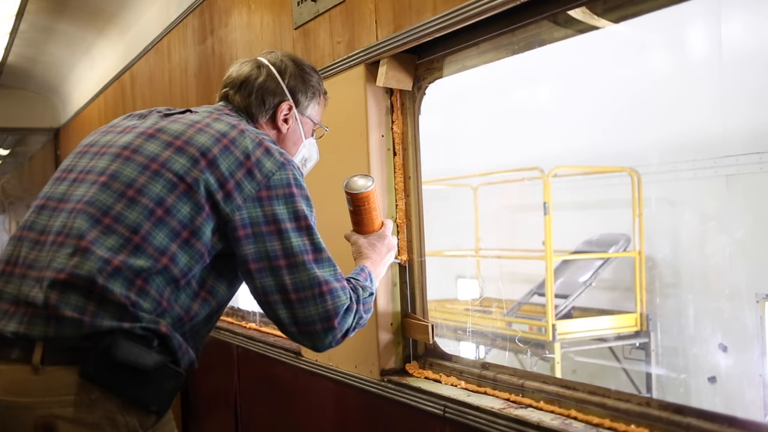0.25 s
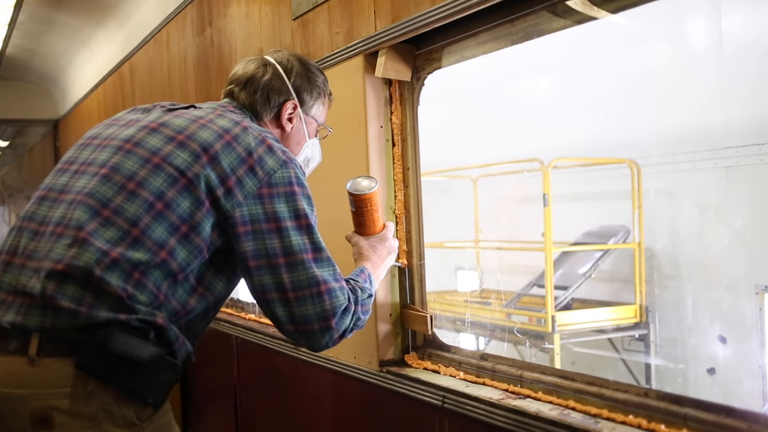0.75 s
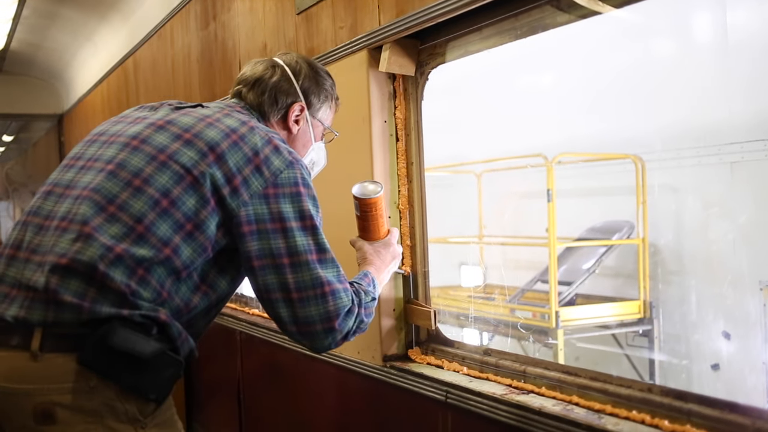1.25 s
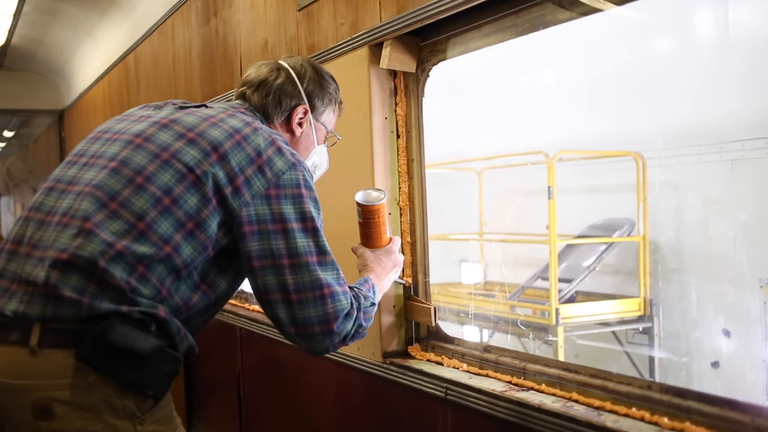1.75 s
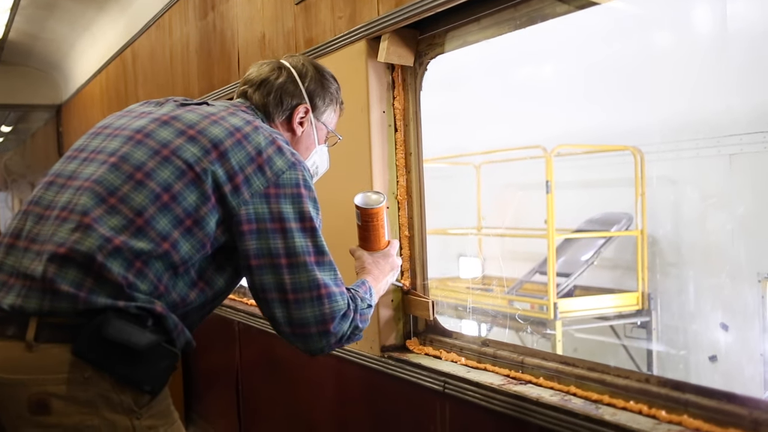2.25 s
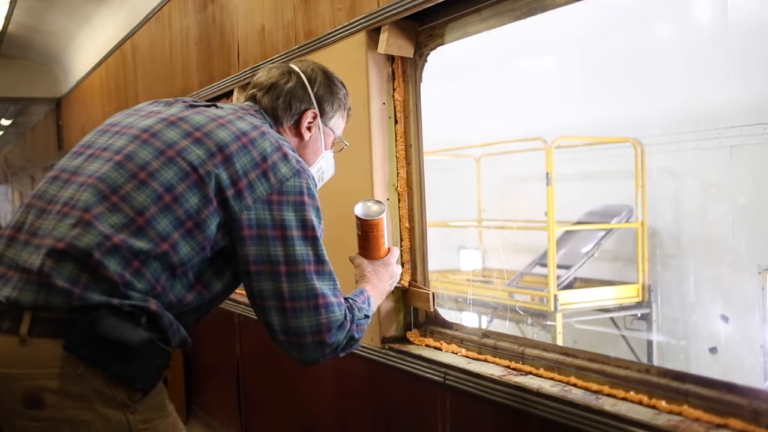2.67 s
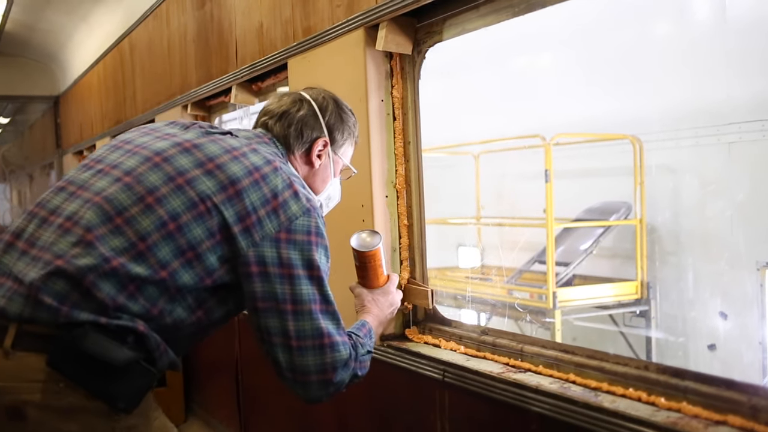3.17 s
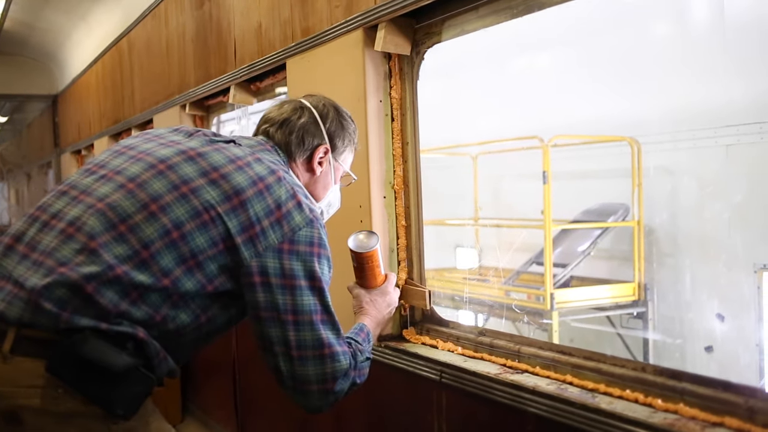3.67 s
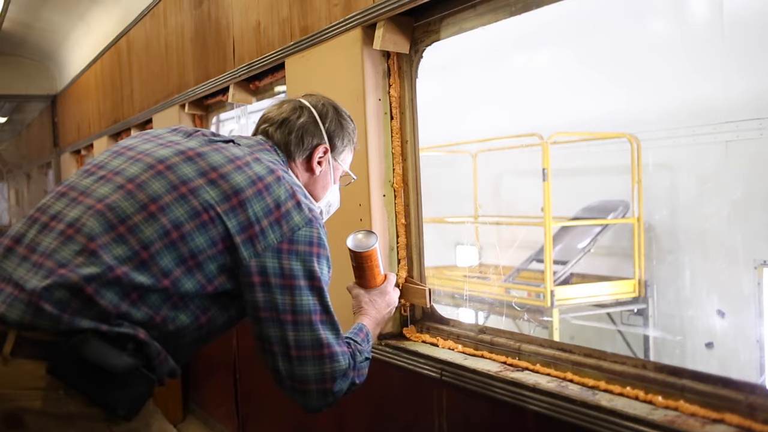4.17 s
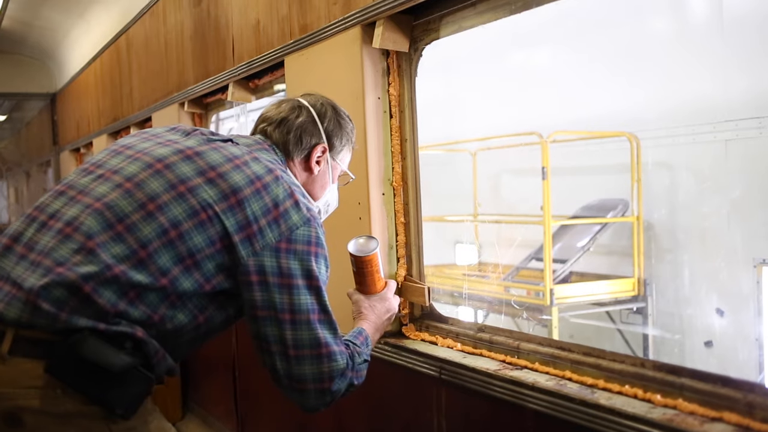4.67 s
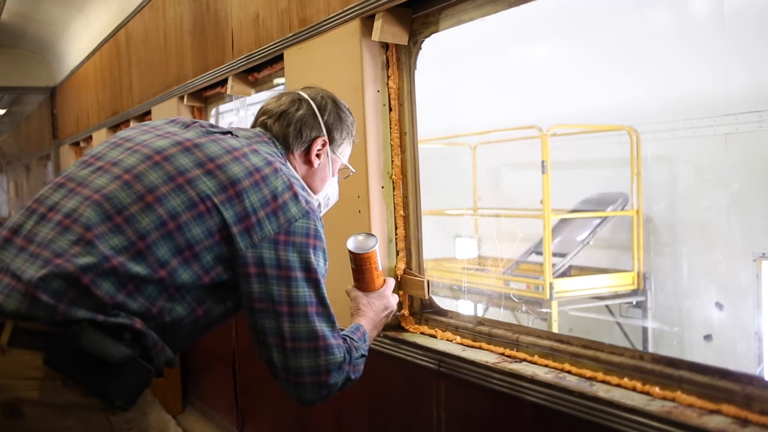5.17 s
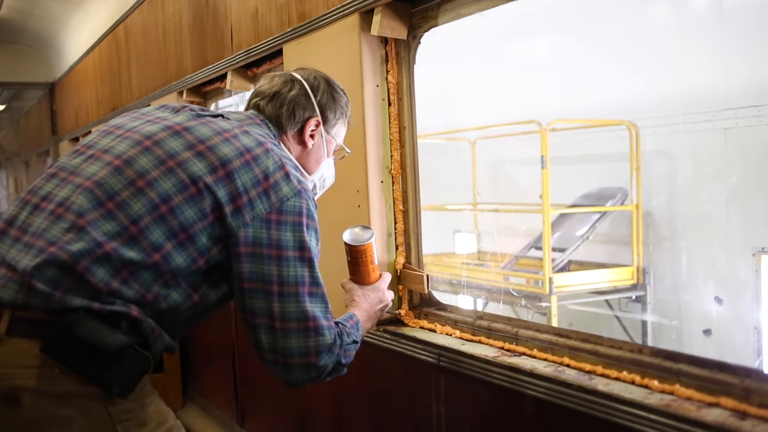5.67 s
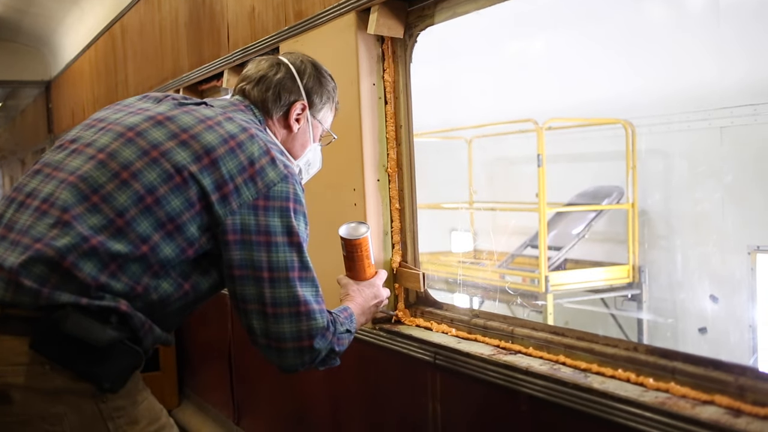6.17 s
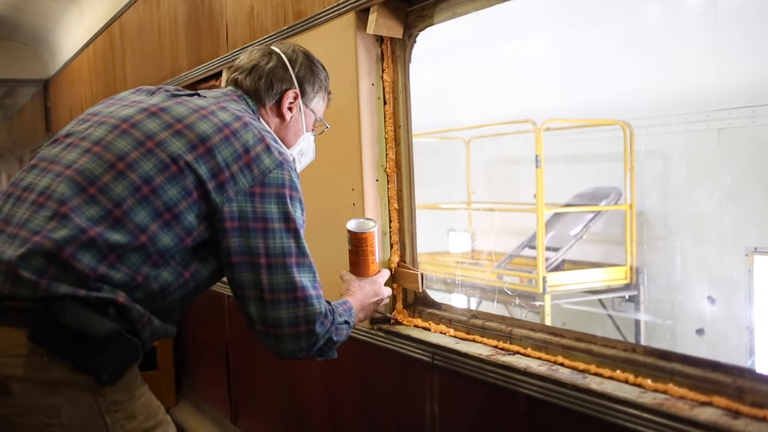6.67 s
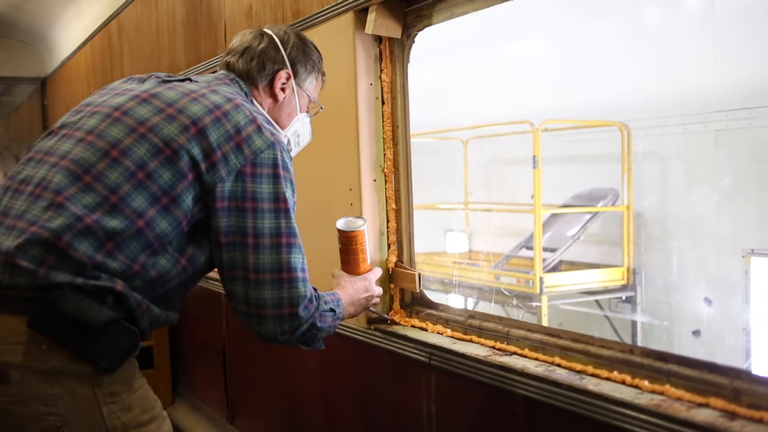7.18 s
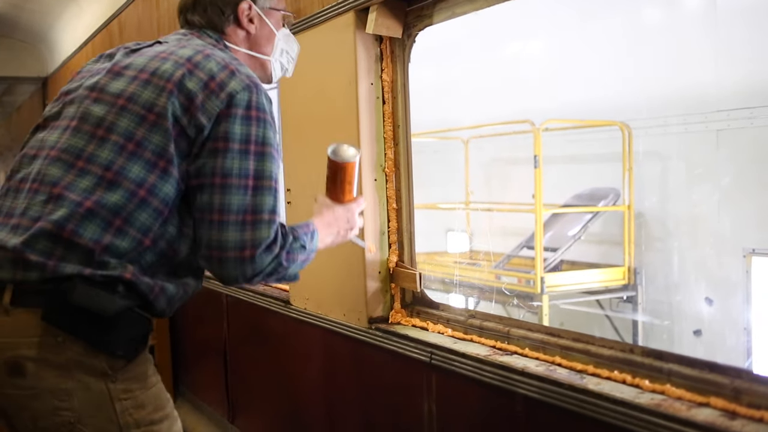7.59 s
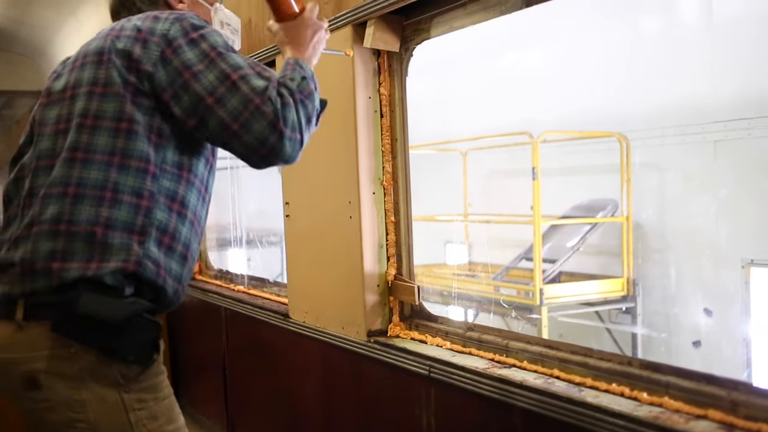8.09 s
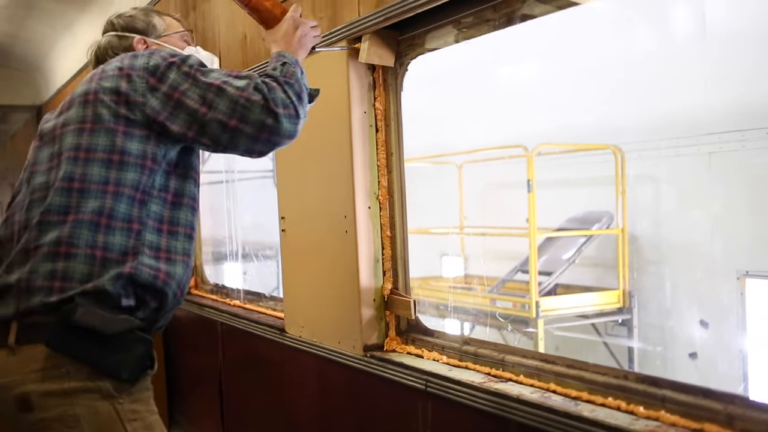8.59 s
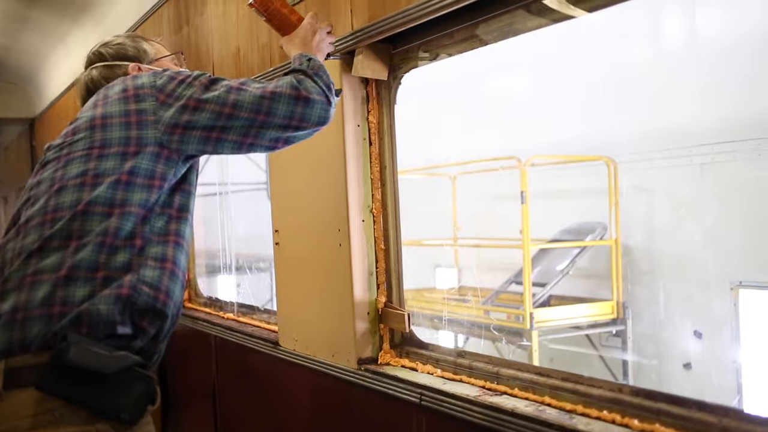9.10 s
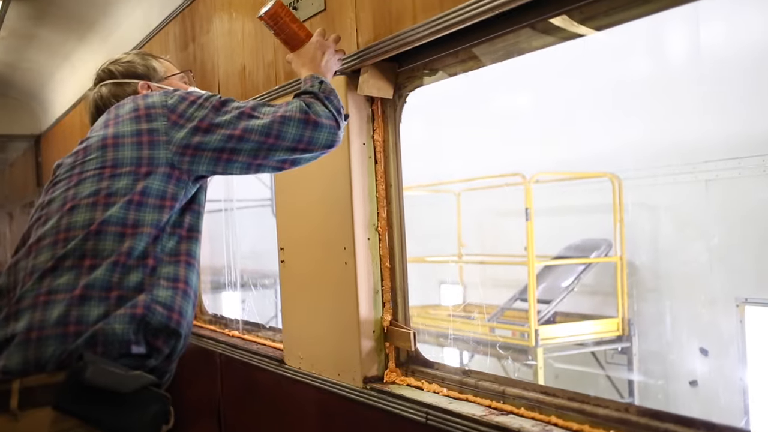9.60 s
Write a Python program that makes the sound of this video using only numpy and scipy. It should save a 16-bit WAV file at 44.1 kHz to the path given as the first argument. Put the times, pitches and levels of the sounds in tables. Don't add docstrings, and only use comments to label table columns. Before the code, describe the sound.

Expanding foam gurgles thick and wet from a can in three squeezes, spitting and crackling over a machine drone, then puffs, knocks and a pop.

```python
import sys
import numpy as np
from scipy import signal
from scipy.fft import rfft, irfft, next_fast_len
from scipy.io import wavfile
from scipy.ndimage import uniform_filter1d

SR = 44100
rng = np.random.default_rng(int(sys.argv[2]) if len(sys.argv) > 2 else 0)


def level_to_linear(level):
    exponent = np.asarray(level, float) / 20
    return 10 ** exponent


def digitize_waveform(pressure):
    field = np.atleast_2d(pressure).T
    bounded = np.clip(field, -1, 1)
    quanta = np.round(bounded * 32767).astype(np.int16)
    wavfile.write(sys.argv[1], SR, quanta)


N = 434369

FIRST_MOVE_S, SECOND_MOVE_S = 1, 2.86
POCKET_HZ = (300, 760, 1300, 1860, 2600, 6000)
# start_s, flow_db, commonest pocket (octaves above the big ones),
# narrowing (dB per octave squared), gas_db
SECOND_SQUEEZE = [
    (2.95, -44.5, 0.0, 3.6, -58),
    (3.3, -39, 0.0, 2.2, -55),
    (3.65, -40, 0.36, 0.41, -54),
    (4.05, -34, 0.0, 1.2, -58),
    (4.45, -34.5, 0.49, 3, -54),
    (4.85, -26, 0.85, 13.6, -50.5),
    (5.1, -31, 0.45, 9.4, -48),
    (5.36, -38, 0.028, 3.4, -57),
    (5.47, -55, 0.2, 5, -62),
]
THIRD_SQUEEZE = [
    (6.28, -59, 0.2, 2, -58),
    (6.36, -42, 0.0, 3, -54),
    (6.44, -41, 0.0, 2.3, -49),
    (6.52, -29.5, 0.0, 7.2, -55),
    (6.78, -32.5, 0.035, 3.2, -55),
    (6.9, -44.5, 0.0, 2.8, -55),
    (7.03, -40.5, 0.17, 7.1, -65),
    (7.15, -38.5, 0.0, 12, -66),
    (7.26, -64.5, 0.0, 3, -62),
]


def rms_one(x):
    return x / np.sqrt(np.mean(x ** 2) + 1e-20)


def in_time(rows):
    s, *columns = np.transpose(rows)
    return [np.interp(np.arange(N) / SR, s, column) for column in columns]


def drift(rate):
    r = np.exp(-40 * np.pi * rate / SR)
    coarse = rng.standard_normal(N // 20 + 4002)
    slow = signal.lfilter([1], [1, -2 * r, r * r], coarse)[4000:]
    return np.interp(np.arange(N) / 20, np.arange(len(slow)), rms_one(slow))


def weigh(x, points_hz, gains):
    size = next_fast_len(N)
    hz = np.maximum(np.arange(size // 2 + 1) * SR / size, 1)
    return rfft(x, size) * np.interp(np.log(hz), np.log(points_hz), gains), size


def colour(x, spectrum):
    size = next_fast_len(N)
    hz = np.maximum(np.arange(size // 2 + 1) * SR / size, 1)
    points_hz, points_db = np.transpose(spectrum)
    gain = level_to_linear(np.interp(np.log(hz), np.log(points_hz), points_db))
    return rms_one(irfft(rfft(x, size) * gain, size)[:N])


def slice_band(x, low_hz, top_hz, high_hz):
    weighted, size = weigh(x, [low_hz, top_hz, high_hz], [0, 1, 0])
    return irfft(weighted, size)[:N]


def resonance(x, hz, width_hz):
    r = np.exp(-np.pi * width_hz / SR)
    zeros = (1 - r * r) / 2 * np.array([1, 0, -1])
    return signal.lfilter(zeros, [1, -2 * r * np.cos(2 * np.pi * hz / SR), r * r], x)


def grains(per_s, spread_db):
    sizes = level_to_linear(spread_db * np.minimum(rng.exponential(1, N), 4)) * rng.choice([-1, 1], N)
    return rms_one(sizes * (rng.random(N) < per_s / SR) + 1e-18)


def bumps(rows, half_s):
    t = np.arange(0, N, 50) / SR
    lift_db = sum(db * np.clip(1 - np.abs(t - s) / half_s, 0, 1) for s, db in rows)
    return np.interp(np.arange(N) / SR, t, lift_db)


def pulses(times, heights, rise_s, fall_s):
    clicks = np.full(N, 1e-18)
    clicks[(np.asarray(times) * SR).astype(int)] = heights
    t = np.arange(4000) / SR
    shape = (1 - np.exp(-t / rise_s)) * np.exp(-t / fall_s)
    return signal.oaconvolve(clicks, shape / shape.max())[:N]


def swells(rows, steady_db):
    t = np.arange(0, N, 100) / SR
    gain = np.full(len(t), level_to_linear(steady_db))
    for middle_s, length_s, db in rows:
        gain += level_to_linear(db) * np.cos(np.pi * np.clip((t - middle_s) / length_s, -.5, .5)) ** 2
    return np.interp(np.arange(N) / SR, t, gain)


def lone_bursts(flow_db):
    # start_s, peak_db
    large_bursts = [(0.027, -13), (0.089, -12), (0.121, -12), (0.177, -13.5), (0.21, -16), (0.258, -13.5),
                    (0.321, -17.5), (0.39, -18), (0.46, -34), (0.491, -23), (0.553, -19.5), (0.577, -13.5),
                    (0.637, -19), (0.701, -19), (0.749, -16.5), (0.832, -26), (0.88, -25), (0.916, -16.5),
                    (0.94, -14.5), (0.965, -16), (1.013, -22), (1.042, -14), (1.096, -14), (1.153, -13),
                    (1.186, -15.5), (1.215, -13.5), (1.292, -20), (1.344, -16), (1.393, -14.5), (1.431, -13.5),
                    (1.454, -16), (1.48, -22), (1.508, -15), (1.562, -19), (1.602, -16), (1.638, -12.5),
                    (1.72, -16), (1.746, -16.5), (1.786, -11.5), (1.822, -13.5), (1.849, -15), (1.89, -14),
                    (1.918, -12.5), (1.962, -8.5), (2.004, -12.5), (2.034, -12.5), (2.102, -10.5), (2.144, -13),
                    (2.203, -16.5), (2.242, -14), (2.291, -18.5), (2.327, -18), (2.375, -17), (2.437, -16.5),
                    (2.481, -21),
                    (3.005, -22), (3.1, -22), (3.233, -20), (3.31, -23), (3.512, -21), (3.596, -14.5),
             (3.678, -27.5), (3.749, -19.5), (3.813, -19.5), (3.845, -25), (3.868, -15.5), (3.931, -14),
             (3.985, -25), (4.018, -28), (4.044, -17), (4.141, -21), (4.171, -16.5), (4.237, -17),
             (4.262, -20.5), (4.288, -21.5), (4.313, -21.5), (4.364, -14), (4.454, -16), (4.476, -28),
             (4.504, -21.5), (4.525, -32), (4.558, -16.5), (4.625, -18.5), (4.676, -22), (4.698, -18),
             (4.734, -17), (4.782, -11), (4.837, -9.5), (4.895, -21), (4.931, -22.5), (4.954, -7.5),
             (5.001, -20), (5.051, -21), (5.085, -27), (5.124, -23.5), (5.157, -14), (5.184, -19.5),
             (5.271, -29), (5.294, -26), (5.33, -21), (6.096, -28), (6.404, -26), (6.446, -18),
             (6.502, -17), (6.532, -25), (6.565, -24), (6.644, -18), (6.732, -15), (6.757, -18),
             (6.788, -16), (6.911, -26), (6.991, -28), (7.094, -22)]
    s, db = np.transpose(large_bursts)
    flow_crest_db = flow_db[(s * SR).astype(int)] + 13
    above_db = np.clip(db - flow_crest_db, 0, 14)
    return 1 + pulses(s, level_to_linear(above_db) - 1, rise_s=0.0026, fall_s=0.0093)


def pockets(flow_db, common_octave, narrowing_db):
    # middle_s, extra_db
    glugs = [(3.12, 5), (3.52, 2), (3.82, 2), (3.99, 9), (4.32, 5.5), (4.51, 4.5), (4.57, 3), (4.74, 6.5),
             (4.9, 9), (5.13, 6), (5.35, 6), (6.425, 11)]
    # middle_s, extra_db
    froth = [(0.08, -2), (0.95, 0), (1.43, -2), (3.41, 8), (3.51, 3), (3.7, 7.5), (3.88, 1), (4.19, -1),
             (4.38, 0), (4.6, 3), (6.45, 1), (6.65, 6), (6.78, 6)]
    small_damped_db = (0.5, -3.5, -5, -1)
    octaves = np.log2(np.array(POCKET_HZ[1:-1]) / POCKET_HZ[1])
    sizes_db = [flow_db - narrowing_db * (octave - common_octave) ** 2 for octave in octaves]
    big_db, middle_db, small_db, fine_db = sizes_db
    corners_s = (FIRST_MOVE_S, FIRST_MOVE_S + 0.33, SECOND_MOVE_S, SECOND_MOVE_S + .45,
                 SECOND_SQUEEZE[-1][0], THIRD_SQUEEZE[0][0])
    corners_db = np.array(small_damped_db)[[0, 1, 1, 2, 2, 3]]
    hollow_db = np.interp(np.arange(N) / SR, corners_s, corners_db)
    big_db = big_db + bumps(glugs, half_s=0.052)
    froth_db = bumps(froth, half_s=0.037)
    small_db = small_db + hollow_db + 0.98 * froth_db
    return big_db, middle_db - big_db, small_db - big_db, fine_db + froth_db - big_db


def hollow(ringing, splashing, modes):
    rung = 0
    for k, (hz, width_hz, db) in enumerate(modes):
        rung = rung + (-1) ** k * level_to_linear(db) * resonance(ringing, hz, width_hz)
    return rms_one(rung) + level_to_linear(-5) * rms_one(resonance(splashing, 570, 1700))


def cavities(stream):
    # start_s, end_s, pitch_hz, width_hz, level_db
    closed = [(0.0, 0.346, 1170, 250, -38), (.05, .4, 2880, 800, -37), (.35, 1.35, 1845, 60, -37.5),
              (.8, 1.4, 1202, 70, -38), (1.85, 2.3, 2680, 1500, -42), (1.7, 2.25, 1510, 220, -34.5),
              (3.55, 4.75, 2450, 90, -48.5), (3.9, 5.0, 773, 60, -42), (4.53, 4.75, 1630, 400, -38),
              (4.76, 5.02, 1650, 500, -39.5), (4.95, 5.15, 1550, 250, -52), (5.03, 5.434, 1080, 120, -39.5),
              (6.35, 6.48, 1800, 900, -44), (6.474, 6.72, 2040, 700, -44), (6.73, 6.858, 2250, 900, -44),
              (6.9, 7.08, 1500, 900, -48)]
    out = np.zeros(N)
    for start, end, hz, width_hz, db in closed:
        at, size = int(start * SR), int((end - start) * SR)
        rung = resonance(resonance(stream[at:at + size], hz, width_hz), hz, width_hz)
        out[at:at + size] += level_to_linear(db) * np.sqrt(np.hanning(size)) * rms_one(rung)
    return out


def gurgle(lone, big_db, *smaller_db):
    # pitch_hz, width_hz, level_db
    first_modes = [(610, 50, -9), (800, 110, -6), (1060, 45, -4), (1345, 70, -4), (1530, 50, -5),
                   (1850, 55, 3), (2100, 60, -5), (2480, 90, -5), (3010, 80, -5), (3300, 80, -7),
                   (3700, 200, -12)]
    second_modes = [(610, 50, -7), (820, 120, -5), (1195, 60, 2), (1425, 70, 1), (1520, 60, 0),
                    (1610, 50, -4), (1860, 50, -4), (2170, 70, -8), (2450, 60, -8), (2600, 90, -7),
                    (2960, 50, -6), (3250, 200, -9)]
    last_modes = [(610, 45, -6), (770, 55, 3), (1095, 60, -1), (1305, 90, 1), (1585, 60, -3),
                  (1800, 45, -7), (1900, 45, -9), (2120, 80, -9), (2510, 70, -6), (2980, 180, -12)]
    clumps = lone * level_to_linear(2.2 * np.tanh(drift(36) / 1.83))
    bursts = [clumps * grains(per_s=2500, spread_db=2.0) for _ in range(2)]
    t = np.arange(N) / SR
    second = np.clip((t - FIRST_MOVE_S) / 0.49 + .5, 0, 1)
    last = np.clip((t - SECOND_MOVE_S) / 0.49 + .5, 0, 1)
    rung = np.sqrt(1 - second) * hollow(*bursts, first_modes)
    rung += np.sqrt(second - last) * hollow(*bursts, second_modes)
    rung += np.sqrt(last) * hollow(*bursts, last_modes)
    out = 0
    for k, above_db in enumerate([0, *smaller_db]):
        band = slice_band(rung, *POCKET_HZ[k:k + 3])
        evened = band / np.sqrt(uniform_filter1d(band ** 2, size=4500) + 1e-12)
        out = out + level_to_linear(big_db + above_db - 3.5) * evened
    panel = rms_one(resonance(bursts[1], 304, 220))
    thrum = level_to_linear(uniform_filter1d(big_db, size=9000) - 14.5) * panel
    return out + thrum + cavities(bursts[1])


def spit(spit_db):
    # pitch_hz, level_db per Hz
    fizz_colour = [(2060, -20.5), (3500, -5), (3970, -4), (7600, -11.5), (8970, -12), (9740, -15),
                   (15100, -32), (16000, -35)]
    # start_s, peak_db, colour_hz
    spatter = [(0.3182, -24, 5630), (0.3601, -25, 6430), (0.416, -43, 6310), (0.5122, -22, 6440),
               (0.5726, -25, 6340), (0.6175, -29, 6910), (0.6589, -31, 6900), (0.7587, -22, 6750),
               (0.7996, -21, 6400), (0.9183, -36, 7100), (1.0086, -40, 5760), (1.0375, -36, 5680),
               (1.1897, -31, 6700), (1.3124, -15, 5140), (1.4755, -48, 6650), (1.5249, -46.5, 5570),
               (1.5673, -43, 6900), (1.638, -14, 7500), (1.7439, -17, 6320), (1.7873, -21, 6540),
               (1.8906, -20, 6300), (1.9704, -33, 5890)]
    fizz = colour(grains(per_s=9000, spread_db=3.5), fizz_colour)
    out = fizz * level_to_linear(spit_db + 6.0 + 3.8 * np.tanh(drift(39) / 0.84))
    t = np.arange(4000) / SR
    shape = (1 - np.exp(-t / 0.0033)) * np.exp(-t / 0.012)
    for s, db, hz in spatter:
        at = int(s * SR)
        torn = fizz[at:at + len(t)]
        tuned = rms_one(resonance(torn, hz, 0.09 * hz))
        out[at:at + len(t)] += level_to_linear(db - 13) * shape * (.5 * torn + tuned)
    return out


def machine():
    # pitch_hz, level_db per Hz
    air_colour = [(15, -60), (30, -35), (50, -16.5), (100, -15), (300, -10.5), (400, -10.5), (500, -15.5),
                  (750, -8), (1200, -16.5), (1800, -17.5), (4300, -17.5), (8000, -22.5), (12000, -27),
                  (16000, -48)]
    # pitch_hz, width_hz, level_db
    duct = [(3090, 500, -7.5), (5760, 650, -7), (2210, 83, -24)]
    multiples = (1, 6, 22)
    steady_db = (-50.5, -60, -61)
    # middle_s, length_s, level_db
    sixth_swells = [
        (0.15, 1.1, -50),
        (1.5, 1.1, -61),
        (3.64, 0.5, -57),
        (5.3, 0.53, -58),
        (6.15, 0.36, -58),
        (6.7, 0.78, -59),
        (7.55, .6, -60),
        (8.9, 2.8, -62),
    ]
    high_swells = [(0.55, 0.76, -61), (1.22, 0.43, -50), (1.68, 0.34, -53), (2.7, 0.57, -55),
                   (2.97, .25, -61), (3.3, .3, -59), (3.8, 0.29, -62), (4.74, 0.43, -59.5),
                   (5.22, .45, -58), (5.57, .2, -54), (6.15, .9, -59), (7.32, 0.63, -54), (7.8, .7, -61),
                   (8.64, .3, -64), (9.56, .12, -59)]
    # middle_s, length_s, level_db
    faint_multiples = (23, 26, 29, 30)
    faint_steady_db = (-69, -69, -71, -71)
    faint_swells = [
        [],
        [(6.05, .9, -60), (3.75, .3, -63)],
        [(9.1, .6, -60)],
        [(7.33, .45, -60)],
    ]
    # middle_s, length_s, level_db
    mains_swells = [(0.0, 0.28, -58), (0.41, .3, -65), (0.76, 0.29, -67), (1.07, 0.19, -60),
                    (1.4, 0.77, -57), (2.15, 0.84, -54), (2.95, 0.42, -64), (3.8, 1.7, -61),
                    (4.62, 0.5, -55), (5.33, 0.31, -59), (6.9, 1.8, -54.5), (8.0, 0.19, -61),
                    (8.56, 0.45, -59), (9.3, 0.75, -59)]
    flow = rng.standard_normal(N)
    humps = sum(level_to_linear(db) * rms_one(resonance(flow[::-1], hz, width)) for hz, width, db in duct)
    air = level_to_linear(-40.5 + 0.12 * drift(0.48)) * (colour(flow, air_colour) + humps)
    whine_hz = 373.2 * (1 + 0.000284 * drift(3.26) + 0.00064 * drift(42.5))
    turn = 2 * np.pi * np.cumsum(whine_hz) / SR
    whine = 0
    for k, db, rows in zip(multiples, steady_db, ([], sixth_swells, high_swells)):
        whine = whine + level_to_linear(4.0) * swells(rows, db) * np.sin(k * turn)
    whine = whine * level_to_linear(2.1 * drift(1.25) + 0.43 * drift(24))
    for k, db, rows in zip(faint_multiples, faint_steady_db, faint_swells):
        whine = whine + swells(rows, db) * level_to_linear(3 * np.tanh(drift(.8))) * np.sin(k * turn)
    hum = np.sqrt(2) * swells(mains_swells, -62) * np.sin(2 * np.pi * 100 * np.arange(N) / SR)
    return air + whine + hum


def rustle():
    cloth = level_to_linear(2.5 * np.tanh(drift(14))) * grains(per_s=9000, spread_db=2.5)
    t = np.arange(N) / SR
    moving = np.clip(np.minimum((t - 7.5) / 0.2, (8.95 - t) / 0.19), 0, 1)
    rest_db, moving_db = -53.5, -43.5
    cloth_colour = [(300, -12), (1500, 0.5), (4000, -4.5), (9000, -6), (16000, -19)]   # Hz, dB per Hz
    return level_to_linear(rest_db + (moving_db - rest_db) * moving) * colour(cloth, cloth_colour)


def crackle():
    # start_s, peak_db
    ticks = [(0.0268, -41), (0.0687, -41), (0.0817, -37), (0.1341, -37), (0.2194, -39), (0.2833, -36),
             (0.3042, -42), (0.3192, -25), (0.3671, -36), (0.4145, -38), (0.4369, -37), (0.4898, -30),
             (0.5726, -32), (0.6175, -28), (0.6374, -30), (0.6589, -28), (0.6873, -21), (0.7013, -24),
             (0.7587, -30), (0.8011, -32), (0.826, -33), (0.9198, -37), (0.9712, -38), (1.0131, -37),
             (1.0365, -35), (1.0794, -29), (1.1079, -30), (1.1288, -33), (1.1538, -35), (1.1857, -29),
             (1.2386, -32), (1.257, -25), (1.3124, -29), (1.3374, -27), (1.3992, -36), (1.4631, -41),
             (1.476, -36), (1.5125, -32), (1.5678, -27), (1.6087, -19), (1.6372, -18), (1.7449, -26),
             (1.7604, -27), (1.7873, -22), (1.8766, -34), (1.9669, -35), (2.0113, -37), (2.0896, -36),
             (2.3411, -38), (2.5177, -33), (2.7576, -34), (2.796, -32), (2.8694, -34), (2.8838, -33),
             (2.9996, -30), (3.0819, -36), (3.2096, -39), (3.2425, -30),
             (3.0594, -38),
        (3.1114, -39),
        (3.2594, -39),
        (3.3394, -39),
        (4.8494, -38),
        (4.9494, -38),
        (4.9994, -34),
        (5.0594, -41),
        (5.1194, -40),
        (5.1994, -41),
    ]
    # pitch_hz, level_db per Hz
    snap_colour = [(3000, -20), (5000, -5), (8000, 5), (11000, 2), (14000, -4), (16000, -13)]
    s, db = np.transpose(ticks)
    snaps = pulses(s, level_to_linear(db - 12.5), rise_s=.002, fall_s=.009)
    return snaps * colour(grains(per_s=12000, spread_db=2.5), snap_colour)


def leaks():
    # start_s, end_s, pitch_hz, width_hz, level_db
    holes = [
        (0.402, .7, 4300, 300, -40),
        (0.284, .62, 6400, 500, -47),
        (0.575, .88, 12100, 3500, -48),
        (1.268, 1.45, 4900, 1800, -35),
        (1.437, 1.806, 9800, 1200, -43),
        (1.8, 2.0, 6300, 600, -46),
        (1.952, 2.397, 3930, 800, -43),
        (4.75, 5.2, 13200, 2000, -56),
    ]
    out = np.zeros(N)
    for start, end, hz, width_hz, db in holes:
        at, size = int(start * SR), int((end - start) * SR)
        air = rng.standard_normal(size)
        whistle = rms_one(resonance(resonance(air, hz, width_hz), hz, width_hz))
        out[at:at + size] += level_to_linear(db) * np.sqrt(np.hanning(size)) * whistle
    return out * level_to_linear(2.0 * np.tanh(drift(25)))


def puffs():
    # start_s, peak_db, hold_s, fade_s, hollow_share_db
    jets = [(6.096, -29.5, .001, 0.003, -10), (6.098, -34, 0.035, 0.019, -5.5),
            (6.204, -45, .002, .003, -17), (6.408, -39, .012, 0.0074, -13),
            (7.392, -34, 0.0076, 0.022, -4.5), (7.41, -41.5, .03, .02, -6), (8.102, -44, 0.024, 0.023, -7),
            (8.356, -39, .015, .015, -20), (9.293, -55, .02, .012, 4), (9.348, -51.5, .04, .02, 6.5),
            (9.405, -42, .005, .004, -20), (9.417, -33.5, .002, 0.0022, -20)]
    # pitch_hz, level_db per Hz
    jet_colour = [(1500, 0), (3000, -5), (6000, -2.5), (9000, -3), (12500, -2.5), (15000, -10), (16000, -7)]
    t, bright, dull = np.arange(N) / SR, 0, 0
    for s, db, hold, fade, share_db in jets:
        rise = np.clip((t - s) / max(0.33 * hold, 1e-4), 0, 1)
        shape = rise * np.exp(-np.maximum(t - s - hold, 0) / max(fade, 1e-3))
        bright = bright + level_to_linear(db) * shape
        dull = dull + level_to_linear(db + share_db) * shape
    gas = grains(per_s=9000, spread_db=3.5)
    blown = rms_one(resonance(gas, 800, 104) - 1.2 * resonance(gas, 1340, 220))
    return bright * colour(gas, jet_colour) + dull * blown


def knocks():
    # start_s, peak_db, pitch_hz, t60_s
    hits = [(6.0967, -25, 1900, 0.0055), (9.6, -30, 800, 0.031), (8.122, -23, 840, 0.016),
            (8.121, -28, 1480, 0.011), (8.33, -33, 600, 0.05), (8.53, -29, 110, 0.13),
            (9.029, -30, 230, 0.045), (9.111, -25, 850, .015), (9.301, -30, 1700, 0.016),
            (9.358, -24, 880, 0.015), (9.368, -28.5, 1700, 0.028), (9.379, -33, 1280, 0.018),
            (9.345, -32, 1950, .015), (9.39, -33, 1850, 0.016), (9.42, -33, 710, 0.026)]
    t, out = np.arange(SR // 2) / SR, np.zeros(N + SR)
    for s, db, hz, t60 in hits:
        ring = np.sin(2 * np.pi * hz * t) + 0.47 * np.sin(2 * np.pi * 1.64 * hz * t)
        onset = np.minimum(t * hz, 1)
        out[int(s * SR):][:len(t)] += level_to_linear(db - 60 * t / t60) * ring * onset
    return out[:N]


def pop():
    # pitch_hz, level_db per Hz
    crack_colour = [(240, -49), (400, -36), (801, 4), (1460, -7), (1820, -20), (2250, -7), (4380, -11),
                    (8240, -8.5), (11600, -9), (12500, -5), (16000, -22)]
    # pitch_hz, level_db, seconds to fall by 90 dB
    plug_modes = [(530, -6, 0.17), (750, -8, 0.054), (2120, -4, 0.086), (2369, -14, 0.059),
                  (3250, -20, 0.09)]
    t = np.maximum(np.arange(N) / SR - 9.5372, 0)
    decay = np.exp(-t / 0.0073) + 0.19 * np.exp(-t / 0.037)
    crack = level_to_linear(-19.5) * decay * colour(rng.standard_normal(N), crack_colour)
    ringing = 0
    for hz, db, t60 in plug_modes:
        ringing = ringing + level_to_linear(db - 30.0 - 90 * t / t60) * np.sin(2 * np.pi * hz * t)
    return (t > 0) * (crack + ringing)


def room(x, t60):
    t = np.arange(int(.5 * SR)) / SR
    dulled = signal.lfilter([1], [1, -.4], rng.standard_normal(len(t)))
    tail = dulled * level_to_linear(-60 * t / t60) * (t > .006)
    return signal.fftconvolve(x, tail / np.sqrt(np.sum(tail ** 2)))[:N]


def scene():
    first_squeeze = [
        (0.0, -26.5, 2.5, 1, -44),
        (0.56, -32.5, 2.25, 0, -46.5),
        (0.78, -32, 0.73, 2.5, -40),
        (0.93, -32, 1, 0.5, -44),
        (1.28, -29, 2.1, 0.5, -44.5),
        (1.7, -29, 1, 2, -39),
        (2.12, -27.5, 1, 3, -48),
        (2.62, -39, 0, -1, -52),
        (2.74, -39.5, 0.54, 15, -59),
    ]
    t = np.arange(N) / SR
    starts = (-1, THIRD_SQUEEZE[0][0])
    ends = (SECOND_SQUEEZE[-1][0] + 0.072, THIRD_SQUEEZE[-1][0] + .1)
    flowing = sum(np.clip(np.minimum(t - a, b - t) / 0.034, 0, 1) for a, b in zip(starts, ends))
    *flow, spit_db = in_time(first_squeeze + SECOND_SQUEEZE + THIRD_SQUEEZE)
    wet = gurgle(lone_bursts(flow[0]), *pockets(*flow))
    foam = flowing * (wet + spit(spit_db) + leaks())
    events = puffs() + pop() + knocks() + rustle()
    echoes = level_to_linear(-12) * room(foam + events, t60=.3)
    return (foam + events + echoes + machine() + crackle())[None]


def roll_off(x):
    return signal.sosfilt(signal.butter(12, 16430, fs=SR, output="sos"), x)


def record(dry):
    t = np.arange(N) / SR
    gate = np.clip(np.maximum((9.768 - t) / .001, (t - 9.842) / .008), 0, 1)
    low_pass = signal.ellip(12, .5, 90, 15700, fs=SR, output="sos")
    return roll_off(signal.sosfilt(low_pass, dry * gate))


dry = scene()
out = record(dry)
digitize_waveform(out)
```